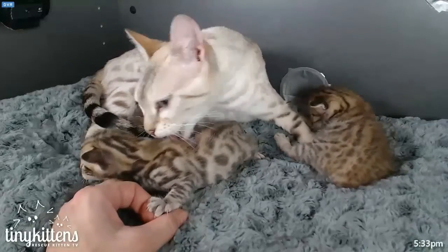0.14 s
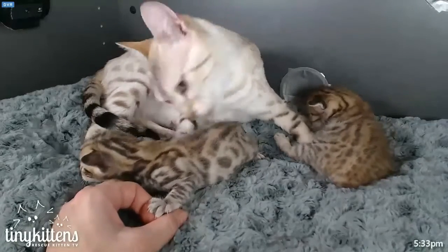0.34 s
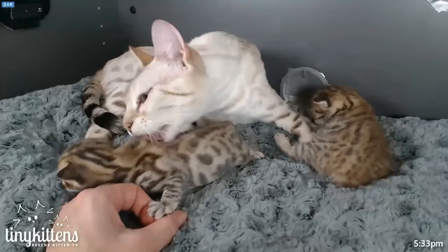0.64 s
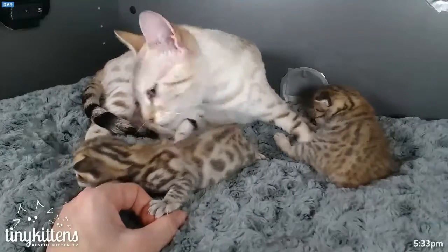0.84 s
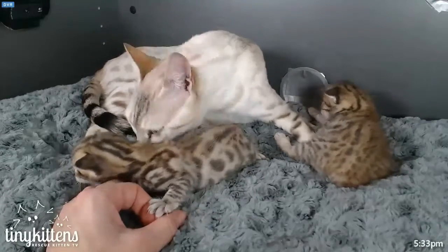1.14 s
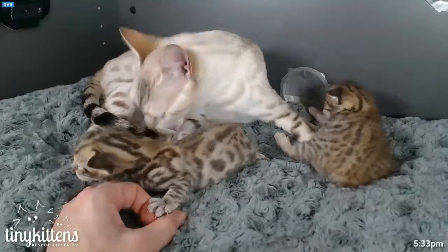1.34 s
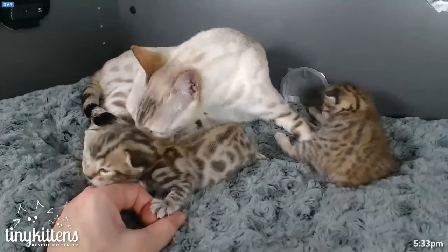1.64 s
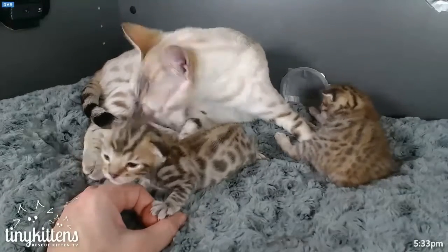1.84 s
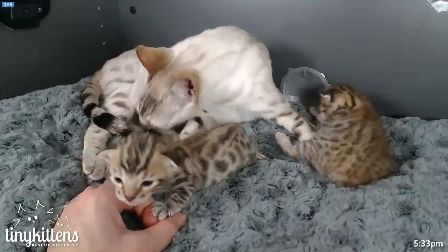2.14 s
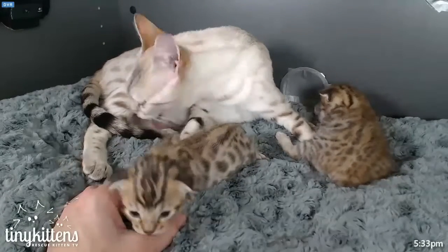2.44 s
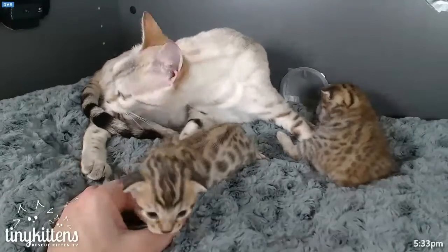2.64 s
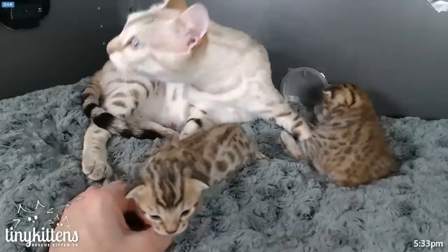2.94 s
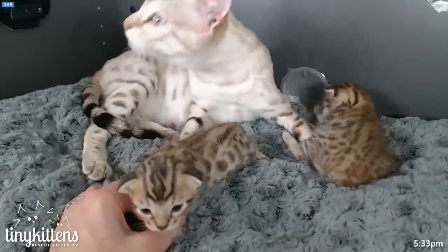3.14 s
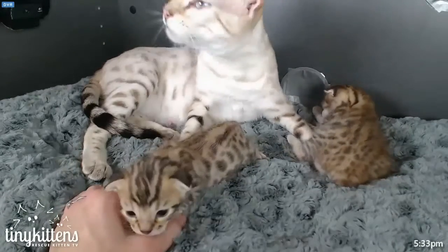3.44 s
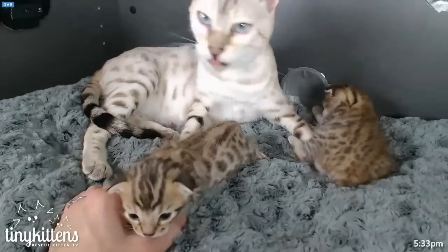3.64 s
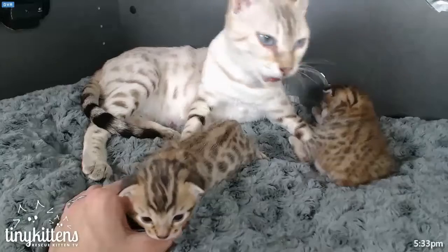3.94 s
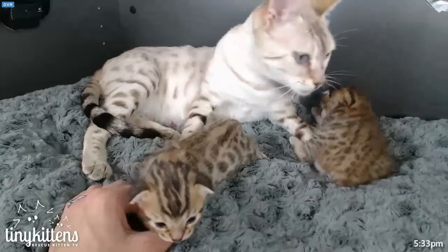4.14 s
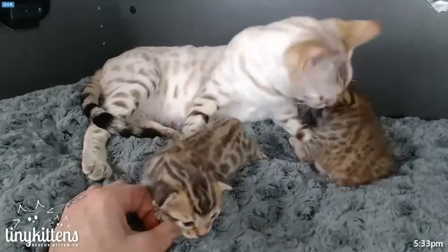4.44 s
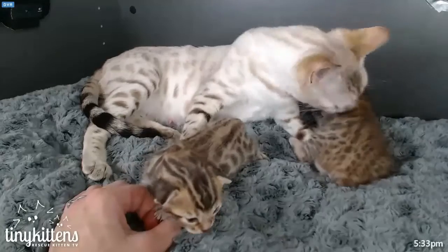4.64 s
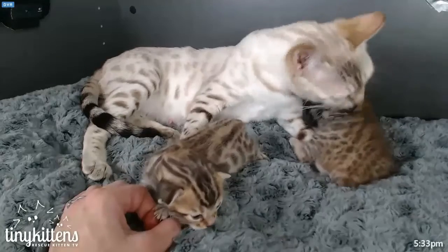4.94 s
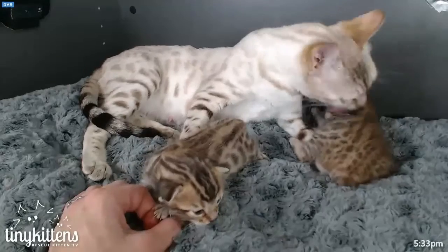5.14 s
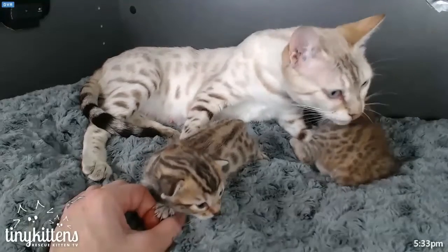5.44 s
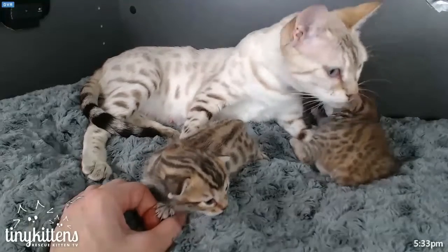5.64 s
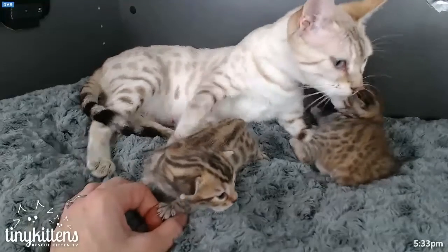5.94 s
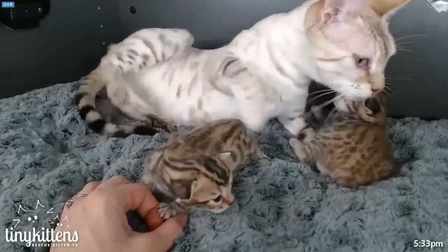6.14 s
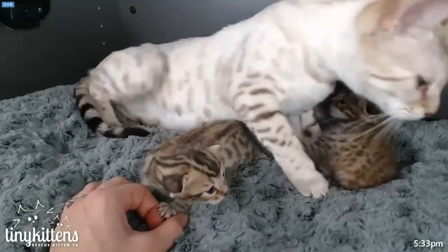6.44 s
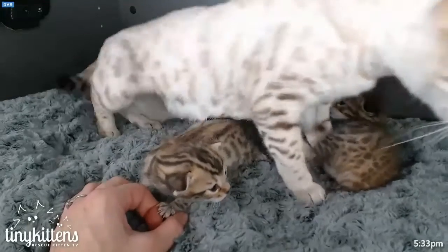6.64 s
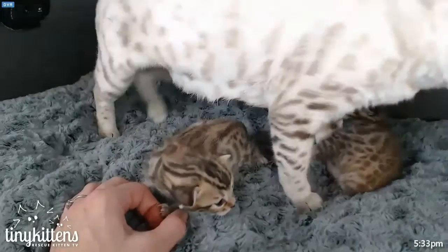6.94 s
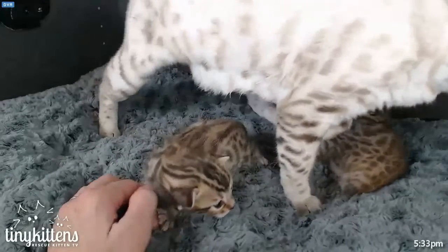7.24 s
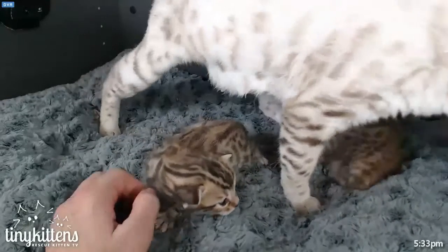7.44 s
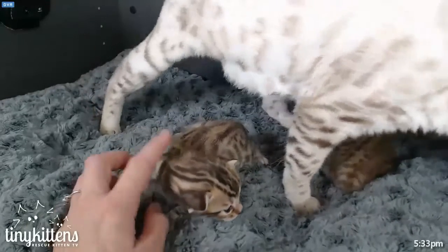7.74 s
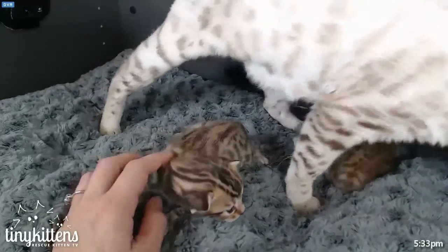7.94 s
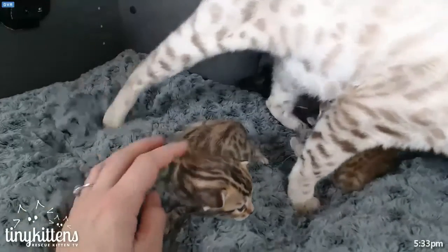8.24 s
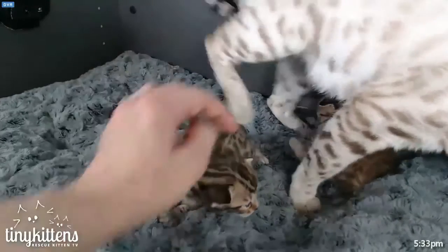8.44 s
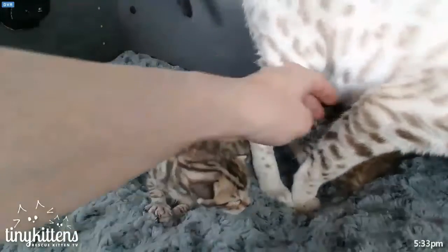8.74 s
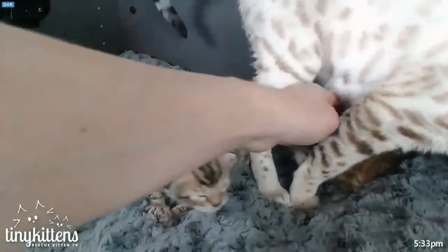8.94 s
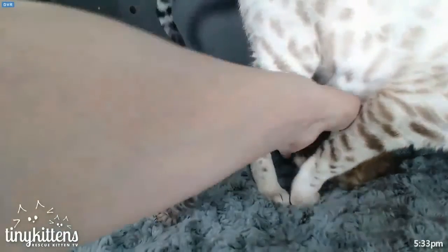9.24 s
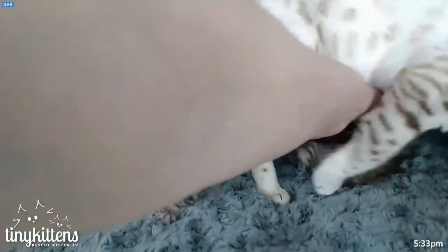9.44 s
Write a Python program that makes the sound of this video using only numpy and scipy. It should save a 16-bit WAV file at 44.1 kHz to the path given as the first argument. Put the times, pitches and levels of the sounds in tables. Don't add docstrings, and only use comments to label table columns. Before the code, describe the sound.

Close, low purring swells and dips breath by breath while licks, soft bumps, claw scrapes and late crunches of fleece sound in a small pen.

```python
import sys
import numpy as np
from scipy import signal
from scipy.io import wavfile
from scipy.ndimage import uniform_filter1d

SR = 44100
rng = np.random.default_rng(int(sys.argv[2]) if len(sys.argv) > 2 else 0)


def unload_wav(signal):
    wavfile.write(
        sys.argv[1],
        SR,
        np.round(np.clip(np.atleast_2d(signal).T, -1, 1) * 32767).astype(np.int16),
    )


def boost(x):
    u = np.asarray(x, float) / 20
    return 10 ** u


N = 423915

# frequency in Hz, level in dB per Hz.
VENTILATION = [(9, -40), (22, -2), (69, -6), (120, -8), (170, -19), (217, -23), (327, -28), (443, -25),
               (706, -33), (929, -33), (3020, -45), (4400, -50), (5530, -50), (6010, -56), (10400, -62),
               (11300, -71), (14700, -99)]
# frequency in Hz, level in dB rms.
HUM = [(120, -55.5), (90, -64), (150, -66), (463, -83)]
# frequency in Hz, level in dB rms.
WHINE = [(5000, -100.5), (5599.5, -101.5), (6999.4, -108), (8999.5, -110)]
# frequency in Hz, offset in Hz, level in dB rms, share of the cycle (0-1).
SENSOR = [(5459.6, 13, -88.5, 1), (7999.5, 0, -99.5, .4), (10509, 15.5, -102, .8)]

# first thump in seconds, rate in pulses per second.
BREATHS = [(0.039, 28.6), (0.413, 29.0), (0.81, 29.3), (1.096, 29.1), (1.675, 28.2), (2.264, 27.9),
           (2.618, 27.2), (2.877, 29.3), (3.147, 29.1), (3.51, 27.0), (3.633, 29.6), (4.145, 28.0),
           (4.824, 28.0), (4.963, 27.4), (5.117, 29.0), (5.235, 27.4), (5.496, 30.3), (5.784, 29.0),
           (6.171, 29.4), (6.422, 28.4), (6.634, 29.5), (7.043, 28.6), (7.35, 28.5), (7.634, 29.0),
           (7.887, 27.0), (8.154, 27.3), (8.548, 28.4), (8.72, 28.0), (8.905, 27.4), (9.197, 28.6),
           (9.409, 27.4)]
# frequency in Hz, length in ms, level in dB.
CHEST = [(142, 12.5, 0), (186, 18, -12), (88, 16, -14)]
# frequency in Hz, length in ms, level in dB.
BELLY = [(120, 14, 0)]
# frequency in Hz, length in ms, level in dB.
THROAT = [(212, 13, 1), (305, 10, -1), (400, 8, -5), (490, 9, -2)]
# frequency in Hz, length in ms, level in dB.
TURNED_THROAT = [(265, 11, 0), (400, 8, -10)]
TURN_S = [7.9, 8.4]
# time in seconds, share of belly (0-1).
BELLY_SHARE = [
    (0, 0.85),
    (2.2, 0.6),
    (4.4, 0.41),
    (6.6, 0.91),
    (8.2, 0.92),
    (9.61, 0.77),
]
# top in seconds, chest level in dB, rise and fall in seconds.
SWELLS = [(.13, -46, 0.24, .2), (.28, -53, .1, 0.068), (.45, -45.5, 0.054, 0.12), (.56, -43.5, 0.043, .12),
          (.62, -44.5, .1, 0.086), (.7, -48.5, .08, .12), (.88, -52.5, 0.069, 0.18), (1.14, -46, .06, 0.12),
          (1.28, -45, 0.14, 0.12), (1.46, -48.5, 0.1, 0.15), (1.72, -48, 0.07, 0.068),
          (1.8, -49, 0.11, 0.087), (1.97, -50, 0.21, 0.048), (2.21, -49, 0.033, 0.054),
          (2.38, -45.5, 0.15, 0.12), (2.53, -46.5, 0.038, 0.054), (2.71, -42.5, 0.1, 0.12),
          (2.93, -52.5, 0.22, 0.26), (3.22, -43, 0.07, 0.093), (3.3, -44, 0.11, 0.067),
          (3.4, -46.5, 0.054, 0.081), (3.74, -49.5, 0.26, .25), (4.05, -53, 0.18, 0.13),
          (4.21, -46.5, .07, 0.18), (4.385, -40.5, 0.13, 0.13), (4.61, -39.5, 0.19, 0.18),
          (4.99, -48, 0.15, 0.16), (5.15, -51.5, 0.14, 0.079), (5.33, -44.5, 0.11, .12),
          (5.58, -50.5, 0.26, 0.17), (5.86, -46.5, 0.1, 0.33), (6.24, -49.5, 0.094, 0.03),
          (6.46, -46, 0.12, .15), (6.65, -49.5, .06, 0.054), (6.85, -58, .2, 0.15),
          (7.08, -45.5, 0.042, 0.11), (7.21, -46.5, 0.11, 0.049), (7.42, -58, 0.085, .15),
          (7.64, -49.5, .05, 0.065), (7.74, -46.5, 0.068, .2), (8.03, -56, 0.071, .1),
          (8.22, -48, 0.11, 0.19), (8.32, -47.5, .07, 0.1), (8.58, -42, 0.065, 0.058),
          (8.77, -47.5, 0.063, 0.065), (8.96, -45, 0.1, 0.21), (9.12, -52, .05, 0.033),
          (9.32, -56, 0.21, 0.17), (9.43, -49, 0.077, 0.064), (9.58, -48, 0.16, .2)]
# time in seconds, knock level in dB.
MOUTH = [(0, -69), (.6, -97), (1.25, -68), (1.6, -89), (2.35, -64), (2.8, -83), (3.7, -75.5), (4.36, -67.5),
         (4.6, -55.5), (4.8, -72), (5.1, -60), (6.0, -70), (6.23, -57), (6.6, -75), (7.7, -70),
         (8.3, -67.5), (8.8, -60.5), (9.61, -64.5)]

# frequency in Hz, width in Hz, level in dB.
AIR_LOW = [(238.6, 49, 7.5), (300, 45, 3.5), (451.7, 105, 7.5), (647, 250, 8.5), (913, 710, 4.5),
           (1330, 22, -13)]
# frequency in Hz, width in Hz, level in dB.
AIR_MIDDLE = [(2250, 600, 1), (3200, 600, 1), (4100, 1200, -3)]
# frequency in Hz, width in Hz, level in dB.
AIR_HIGH = [(6520, 2800, -1), (8700, 2500, -8)]
# middle in seconds, length in seconds, low range in dB,
# middle range in dB against low.
RUSTLES = [(.1, 0.3, -65, -13.5), (0.493, 0.94, -95.5, 18), (0.97, 0.83, -83.5, 1.5),
           (2.665, 0.084, -66, -23), (2.732, 0.11, -75.5, -2), (2.9, 0.25, -75, -2),
           (3.276, 0.86, -69.5, -12), (3.755, 0.54, -63.5, -11.5), (4.026, 0.61, -74.5, -3),
           (4.54, 0.97, -70.5, -9.5), (4.793, 0.054, -80, 9), (5.024, 0.45, -68.5, -7),
           (5.155, 0.26, -64.5, -13.5), (5.313, 0.19, -64, -14), (5.603, 0.46, -68.5, -7.5),
           (5.84, 0.22, -64, -22), (6.06, 0.089, -85.5, -7), (6.232, 0.25, -54.5, -23),
           (6.504, 0.21, -64, -17), (7.138, 0.34, -70, -11), (7.506, 0.068, -66, -9),
           (7.713, 0.36, -75, -6.5), (8.21, 0.21, -68, -15), (8.28, 0.14, -65, -8.5),
           (8.457, 0.17, -62, -19), (8.567, 0.12, -60, -17.5), (8.786, 0.42, -63.5, -17),
           (9.025, 0.13, -62.5, -14), (9.366, 0.47, -63.5, -11.5), (9.576, 0.14, -68.5, -8)]

# time in seconds, peak in dB, frequency in Hz, t60 in seconds.
BUMPS = [
    (0.044, -52, 507, 0.057),
    (2.036, -38.5, 205, 0.081),
    (2.195, -59, 207, 0.066),
    (2.902, -45.5, 198.5, 0.19),
    (3.149, -50, 550, 0.061),
    (5.281, -40.5, 490, 0.036),
    (5.81, -43.5, 168, 0.15),
    (6.185, -49, 194, 0.25),
    (6.225, -38.5, 168, 0.17),
    (6.258, -65, 227, 0.052),
]
# time in seconds, peak in dB, centre in Hz.
TICKS = [(0.0458, -51.5, 2000), (0.092, -62.5, 2090), (0.607, -61, 2180), (1.003, -64, 3230),
         (1.6245, -59.5, 2540), (1.764, -67, 2700), (2.0396, -67, 2460), (2.674, -56, 3150),
         (2.707, -57, 2770), (2.716, -63, 2630), (2.853, -57.5, 3220), (2.858, -61, 3640),
         (2.879, -63, 3250), (2.891, -60, 3450), (2.908, -63, 2400), (2.9303, -69, 2850),
         (3.1496, -68, 2300), (3.2241, -72, 3370), (3.64, -64, 3450), (3.8096, -59, 3300),
         (4.0622, -60.5, 2700), (4.2357, -58, 3500), (4.64, -61, 3840), (4.786, -62, 2820),
         (5.019, -59, 2300), (5.056, -59.5, 2460), (5.248, -62, 2880), (5.2805, -49.5, 2280),
         (5.9768, -55.5, 3300), (6.4714, -67, 2850), (7.1008, -64, 1910), (8.2544, -57, 2940),
         (8.8583, -66, 2840), (9.3776, -81, 2760)]
# start, length and gap in seconds, peak in dB.
LICKS = [
    (0.4, 0.075, 0.025, -63),
    (0.914, 0.095, .0305, -53.5),
    (1.179, 0.08, 0.04, -58.5),
    (5.569, 0.059, 0.029, -57),
]
MOUTH_CAVITY_HZ = [3250, 2120]
# time in seconds, peak in dB, centre in Hz.
SCUFFS = [(0.046, -28, 545), (0.644, -42, 810), (1.218, -39, 576), (2.027, -41, 600), (2.673, -37, 790),
          (3.151, -36.5, 577), (3.921, -42, 920), (5.283, -54, 584), (5.571, -42, 1020), (5.81, -32, 624),
          (5.98, -39, 556), (6.195, -34, 620), (6.227, -33, 624), (6.262, -42, 650), (6.472, -59, 584),
          (6.511, -40, 660), (8.293, -60, 700), (8.598, -38, 630), (8.684, -38, 696), (8.861, -40, 760),
          (9.311, -32, 720), (9.451, -40, 774)]
# start in seconds, length in seconds, peak in dB, centre in Hz.
SHIVERS = [
    (4.57, .09, -64, 550),
    (7.691, .09, -42, 610),
    (8.404, .09, -42, 670),
    (8.759, .05, -42, 700),
    (9.01, .05, -59, 716),
]
# time in seconds, peak in dB, centre in Hz.
SNAPS = [(0.0486, -59.5, 1900), (1.5177, -56, 5140), (1.5534, -68, 5760), (2.04, -63.5, 2600),
         (2.095, -64, 4200), (2.1166, -58, 4870), (2.6725, -62, 3000), (5.2822, -61, 2500),
         (2.526, -62.5, 5830), (2.701, -63, 4190), (2.996, -65, 5570), (6.052, -62, 5460),
         (6.0633, -53, 5840), (6.139, -65, 5490), (6.5118, -51, 4160), (6.5129, -54, 1900),
         (6.971, -67, 5480), (9.153, -62.5, 5630)]
# middle in seconds, length in seconds, level in dB.
NASAL_PUFFS = [(0.48, 0.2, -74), (0.97, 0.34, -73), (3.275, 0.22, -77), (3.744, .4, -72), (5.067, 0.15, -79),
               (5.643, 0.19, -77), (8.219, 0.36, -80), (8.47, 0.34, -86), (8.77, 0.22, -81), (9.006, 0.15, -87),
               (9.353, .3, -73), (9.565, 0.21, -77)]
# start in seconds, length in seconds, level in dB, cavity in Hz.
RASPS = [(0.393, .11, -80, 3130), (.91, 0.14, -75, 3180), (0.935, 0.076, -76, 2150),
         (2.701, 0.043, -77, 2800), (2.851, 0.026, -69, 3570), (2.872, .036, -71, 3350),
         (2.895, 0.047, -75, 2400), (2.917, .06, -77, 3150), (4.053, 0.086, -75, 3330),
         (5.1, 0.083, -81, 3340), (5.559, .1, -76, 3100)]
# time in seconds, peak in dB, frequency in Hz, length in seconds.
THUDS = [
    (1.5, -53, 50.5, 0.1),
    (6.501, -53, 44.5, 0.2),
    (7.028, -48, 44.2, 0.11),
    (8.375, -50.5, 55, 0.14),
    (8.545, -52, 45, 0.17),
]
# time in seconds, peak in dB, t60 in seconds.
SCRAPES = [(6.154, -58, 0.086), (6.182, -53.5, 0.13), (6.197, -56, 0.078), (6.217, -56, .08),
           (6.227, -57, 0.14), (6.247, -67, 0.055), (6.261, -65, .1), (6.281, -60, 0.13),
           (6.315, -58.5, .1), (6.344, -60, .15), (6.441, -59, .1), (6.471, -56.5, 0.061), (6.486, -60, .1),
           (5.575, -62, .1), (5.61, -61, .1), (8.433, -61, .08), (8.462, -59, .1), (8.755, -60, .08),
           (9.04, -59, .08), (9.28, -63, .1), (9.33, -59, .1)]
# frequency in Hz, width in Hz, level in dB.
SCRAPE_BANDS = [(1050, 500, 0), (1700, 900, -2), (2700, 1200, -5), (4000, 1500, -10), (6300, 1500, -17)]
# time in seconds, pitch in Hz, level in dB.
SQUEAK = [
    (6.012, 980, -57),
    (6.025, 1106, -55.5),
    (6.034, 1078, -57.5),
    (6.041, 1074, -59),
    (6.056, 814, -73),
]
SQUEAK_HARMONICS_DB = [4, 9.5, 12, -6, -30, -12, -13, -20, -10]
# time in seconds, peak in dB.
CRUNCHES = [(8.151, -61), (8.1843, -56), (8.2574, -62), (8.2921, -56), (8.3998, -63), (8.434, -70),
            (8.523, -58), (8.5997, -50), (8.7001, -64), (8.7214, -59), (8.7809, -55), (8.7909, -52.5),
            (8.966, -55.5), (9.002, -52.5), (9.0329, -57), (9.241, -61), (9.3133, -50.5), (9.355, -50),
            (9.4135, -56), (9.4519, -55), (9.5395, -54), (9.574, -52)]


def evened(x):
    return x / np.sqrt(np.mean(x ** 2) + 1e-20)


def seconds(count):
    return np.arange(count) / SR


def curve(rows):
    s, value = np.transpose(rows)
    return np.interp(seconds(N), s, value)


def add(mix, s, sound):
    part = mix[max(round(s * SR), 0):][:len(sound)]
    part += sound[:len(part)]


def peaked(sound, db):
    return boost(db) * sound / abs(sound).max()


def resonate(x, hz, width):
    return signal.lfilter(*signal.iirpeak(hz, hz / width, SR), x)


def band(x, hz, width):
    return resonate(resonate(x, hz, width), hz, 1.05 * width)


def drift(hz):
    size = int(SR / hz)
    return evened(uniform_filter1d(uniform_filter1d(rng.standard_normal(N), size), size))


def room():
    frames, hz = N // 512 + 5, np.fft.rfftfreq(2048, 1 / SR)
    real, imaginary, patches = rng.standard_normal((frames, 1025, 3)).T
    patches = evened(uniform_filter1d(uniform_filter1d(patches, 15, 0), 6, 1))
    f, db = np.transpose(VENTILATION)
    colour = np.interp(np.log(hz + 1), np.log(f + 1), db)[:, None]
    spectrum = (real + 1j * imaginary) * boost(colour + 0.67 * patches)
    noise = signal.istft(spectrum, nperseg=2048, noverlap=1536)[1][:N]
    return boost(-56) * evened(noise)


def tones(lines, waver_db, waver_hz):
    t, out = seconds(N), 0
    for k, (hz, db) in enumerate(lines):
        level = boost(db + waver_db * drift(waver_hz))
        out += np.sqrt(2) * level * np.sin(2 * np.pi * hz * t + k)
    return out


def sensor():
    t, out = seconds(N), 0
    cycle = t * 30 % 1
    for hz, offset, db, on in SENSOR:
        out += np.sqrt(2) * boost(db) * (cycle < on) * np.sin(2 * np.pi * (hz * t + offset * cycle / 30))
    return out


def pulses():
    lead_s, jitter_s, uneven_db = .006, .0005, 1.0
    train, luck = np.zeros(N), rng.standard_normal((len(BREATHS), 30, 2))
    ends = [s for s, _ in BREATHS[1:]] + [N / SR]
    for (s, rate), end, chance in zip(BREATHS, ends, luck):
        at = s - lead_s + np.arange(30) / rate + jitter_s * chance[:, 0]
        inside = (at > 0) & (at < end - .025)
        train[(at[inside] * SR).astype(int)] = boost(uneven_db * chance[inside, 1])
    return train


def puffs(train, size):
    return evened(signal.oaconvolve(train, signal.windows.hann(size))[:N])


def ring(train, modes):
    ms, shape = seconds(3000) * 1000, 0
    for hz, length, db in modes:
        envelope = ms / length * np.exp(-(ms / length) ** 2)
        shape -= boost(db) * envelope * np.sin(2 * np.pi * hz * ms / 1000)
    return evened(signal.oaconvolve(train, shape)[:N])


def effort():
    t = np.arange(0, N + 64, 64)[:, None] / SR
    top, db, rise, fall = np.transpose(SWELLS)
    away = np.maximum((top - t) / rise, (t - top) / fall)
    arches = db - 14 * away ** 2
    return np.repeat(arches.max(axis=1), 64)[:N]


def purr(train):
    chest_db = uniform_filter1d(effort(), size=400)
    deep = curve(BELLY_SHARE)
    thump = np.sqrt(1 - deep) * ring(train, CHEST) + np.sqrt(deep) * ring(train, BELLY)
    uneven = train * boost(1.5 * rng.standard_normal(N))
    turned = np.interp(seconds(N), TURN_S, [0, 1])
    knock = (1 - turned) * ring(uneven, THROAT) + turned * ring(uneven, TURNED_THROAT)
    knock_db = curve(MOUTH) + 0.61 * (chest_db + 45.5)
    return boost(chest_db) * thump + boost(knock_db) * knock


def brushing():
    nose_db = np.array([-70, -86, -94])
    power = np.ones(N) * boost(nose_db)[:, None] ** 2
    for s, length, db, middle_db in RUSTLES:
        bell = signal.windows.hann(round(length * SR)) ** 2
        for row, rel_db in zip(power, (0, middle_db, middle_db - 7.5)):
            add(row, s - length / 2, boost(db + rel_db) ** 2 * bell)
    return np.sqrt(power)


def air(train):
    puffed = 0.091
    gusts, shared_db, out = puffs(train, 700), 1.2 * drift(40), 0
    for gain, group in zip(brushing(), (AIR_LOW, AIR_MIDDLE, AIR_HIGH)):
        grit = boost(shared_db + 3.2 * drift(200) + 1.8 * drift(40))
        drive = rng.standard_normal(N) * (puffed * gusts + (1 - puffed) * evened(grit))
        out += gain * evened(sum(boost(db) * evened(band(drive, hz, width)) for hz, width, db in group))
    return out


def bump(db, hz, t60):
    t = seconds(6000)
    knock = np.sin(2 * np.pi * hz * t) + resonate(rng.standard_normal(len(t)), 500, 300)
    return boost(db + 2 - 60 * t / t60) * (1 - np.exp(-t / 0.0044)) * knock


def tick(db, hz):
    t = seconds(4000)
    t60 = 92 / hz
    burst = rng.standard_normal(len(t)) * boost(-60 * t / t60) * (1 - np.exp(-(t / .003) ** 2))
    bands = [(hz, 580, .8), (5400 - hz, 420, -9), (1330, 250, -10), (7800, 5000, -15.5)]  # Hz, width Hz, dB
    return sum(peaked(band(burst, f, width), db + rel_db) for f, width, rel_db in bands)


def tongue():
    rows = list(TICKS)
    for start, length, gap, db in LICKS:
        for k, s in enumerate(np.arange(0, length, gap)):
            rows.append((start + s, db - 30 * (s / length - .5) ** 2, MOUTH_CAVITY_HZ[k % 2]))
    return rows


def scuff(db, hz):
    t = seconds(3000)
    burst = (rng.standard_normal(len(t)) + 6 * boost(-60 * t / .003)) * boost(-60 * t / .045)
    body = band(burst, hz, 250) + .5 * band(burst, 690, 250) + 1.1 * band(burst, 1340, 200)
    return peaked(body, db - 14)


def fleece():
    rows = list(SCUFFS)
    for start, length, db, hz in SHIVERS:
        for s in np.arange(0, length, .036):
            rows.append((start + s, db, hz))
    return rows


def snap(db, hz):
    t = seconds(2000)
    burst = rng.standard_normal(len(t)) * (boost(-60 * t / .004) + .12 * boost(-60 * t / .04))
    click = resonate(burst, hz, 1100) + 0.16 * band(burst, 8900, 1700) + 0.87 * band(burst, 2360, 3000)
    return peaked(click, db + 7)


def nasal(train):
    gain, puffed = np.zeros(N), .75
    for s, length, db in NASAL_PUFFS:
        add(gain, s - length / 2, boost(db) * signal.windows.hann(round(length * SR)))
    breath = rng.standard_normal(N) * (puffed * puffs(train, 800) + 1 - puffed)
    return gain * evened(band(breath, 1350, 160))


def rasp(length, db, hz):
    size = round(length * SR)
    grains = np.repeat(boost(5 * rng.standard_normal(120)), 70)[:size]
    drag = rng.standard_normal(8400)[:size] * grains
    return boost(db) * signal.windows.tukey(size, .4) * evened(band(drag, hz, 450))


def thud(db, hz, length):
    t = seconds(round(length * SR))
    return boost(db) * signal.windows.hann(len(t)) * np.sin(2 * np.pi * hz * t)


def scrape(db, t60):
    t = seconds(5000)
    grains = np.repeat(boost(5.5 * rng.standard_normal(100)), 50)
    burst = rng.standard_normal(len(t)) * grains * boost(-60 * t / t60) * (1 - np.exp(-t / .003))
    body = sum(boost(rel_db) * evened(band(burst, hz, width)) for hz, width, rel_db in SCRAPE_BANDS)
    return peaked(body, db)


def squeak():
    s, hz, db = np.transpose(SQUEAK)
    t = np.arange(s[0], s[-1], 1 / SR)
    turns, stack = np.cumsum(np.interp(t, s, hz)) / SR, 0
    for k, harmonic_db in enumerate(SQUEAK_HARMONICS_DB, 1):
        stack += boost(harmonic_db) * np.sin(2 * np.pi * k * turns)
    return boost(np.interp(t, s, db)) * evened(stack) * signal.windows.tukey(len(t), .3)


def crunch(db):
    t = seconds(3000)
    burst = (rng.standard_normal(len(t)) + 4 * boost(-60 * t / .003)) * boost(-60 * t / .055)
    body = band(burst, 1340, 200) + .5 * band(burst, 690, 200)
    body += .3 * band(burst, 1020, 250) + .2 * band(burst, 2300, 1400)
    return peaked(body, db)


def echoes(near):
    t = seconds(4000)
    walls = rng.standard_normal(len(t)) * boost(-60 * t / .09) * (t > .003)
    return boost(-12) * signal.oaconvolve(near, walls / np.linalg.norm(walls))[:N]


def scene():
    train, near = pulses(), np.zeros(N)
    layers = [(bump, BUMPS), (tick, tongue()), (scuff, fleece()), (snap, SNAPS), (rasp, RASPS),
              (thud, THUDS), (scrape, SCRAPES), (crunch, CRUNCHES)]
    for source, events in layers:
        for s, *settings in events:
            add(near, s, source(*settings))
    add(near, SQUEAK[0][0], squeak())
    near += air(train) + nasal(train)
    hum = tones(HUM, waver_db=2.6, waver_hz=9)
    whine = tones(WHINE, waver_db=2, waver_hz=4.4)
    return (purr(train) + near + echoes(near) + room() + hum + whine + sensor())[None]


def low_pass(x):
    return signal.sosfilt(signal.butter(12, 11440, fs=SR, output="sos"), x)


def record(dry):
    limited = signal.oaconvolve(dry, signal.firwin(255, 11000, fs=SR)[None], "same")
    hiss = boost(-93.5) * rng.standard_normal(dry.shape)
    return low_pass(limited + hiss)


dry = scene()
out = record(dry)
unload_wav(out)
```